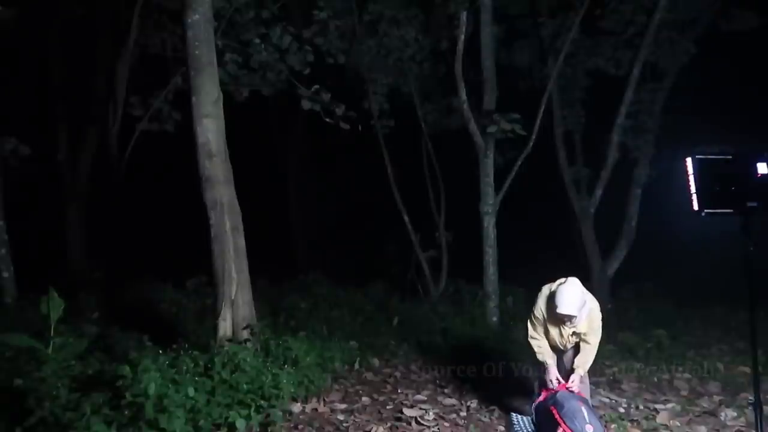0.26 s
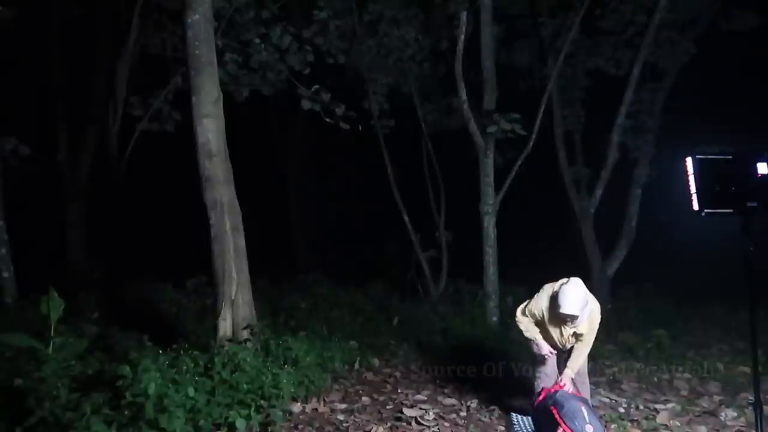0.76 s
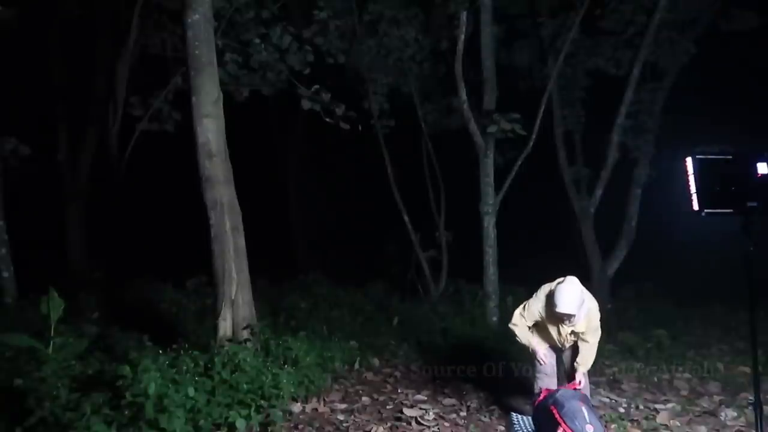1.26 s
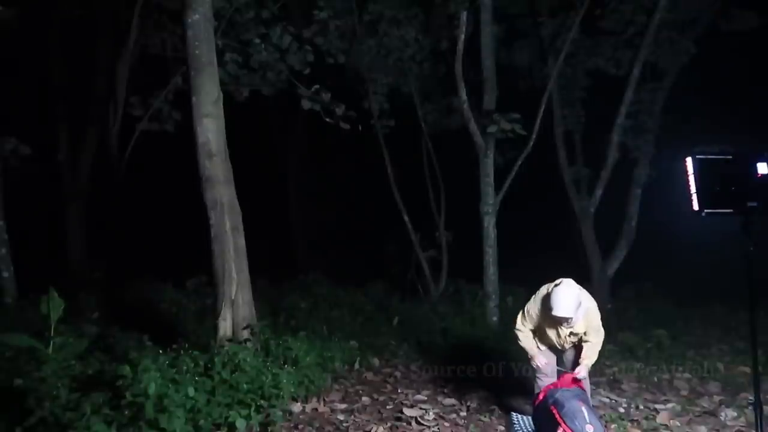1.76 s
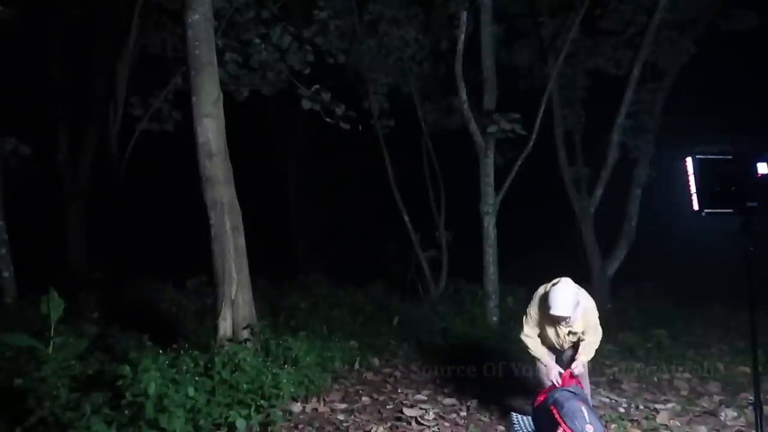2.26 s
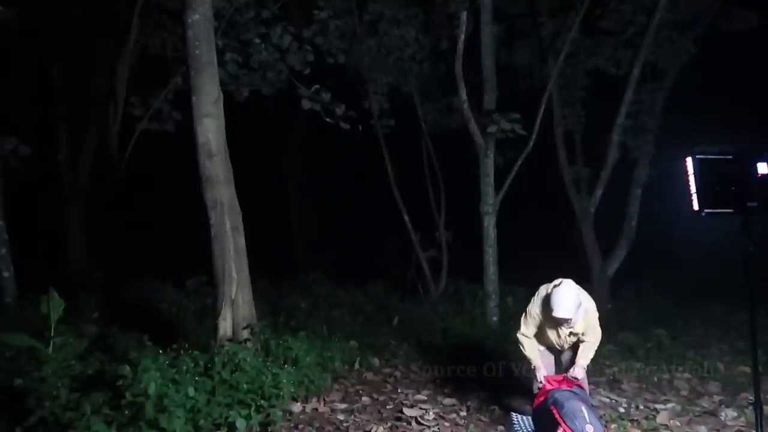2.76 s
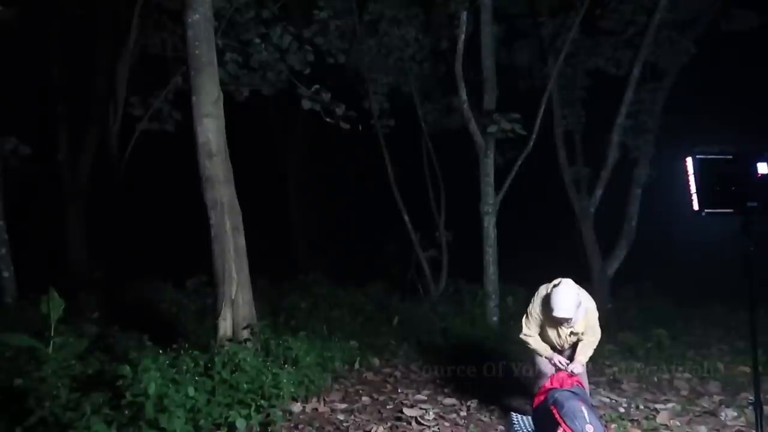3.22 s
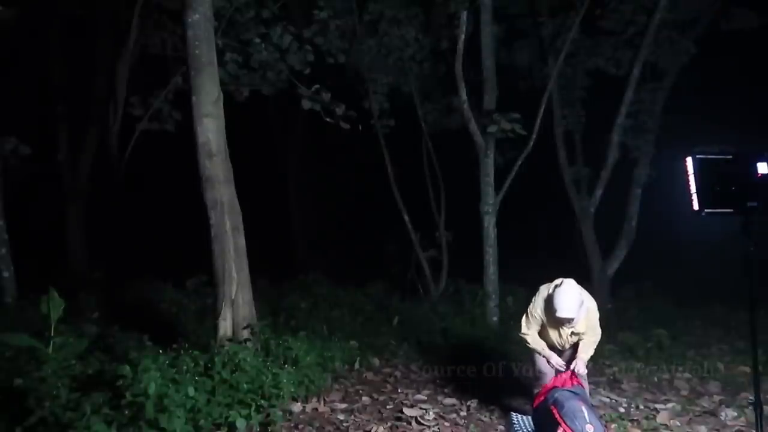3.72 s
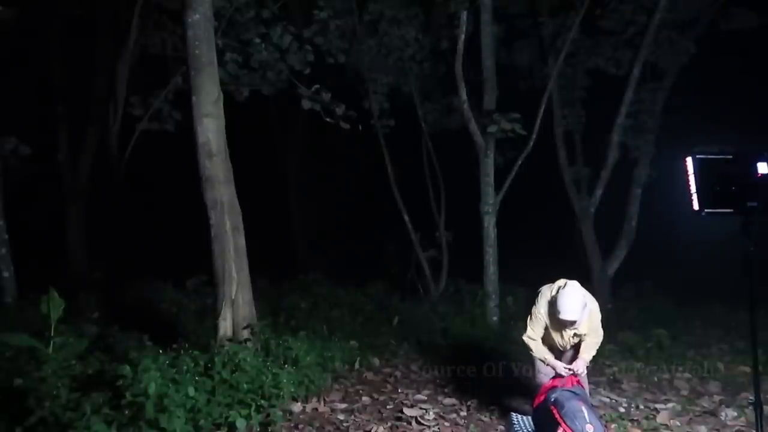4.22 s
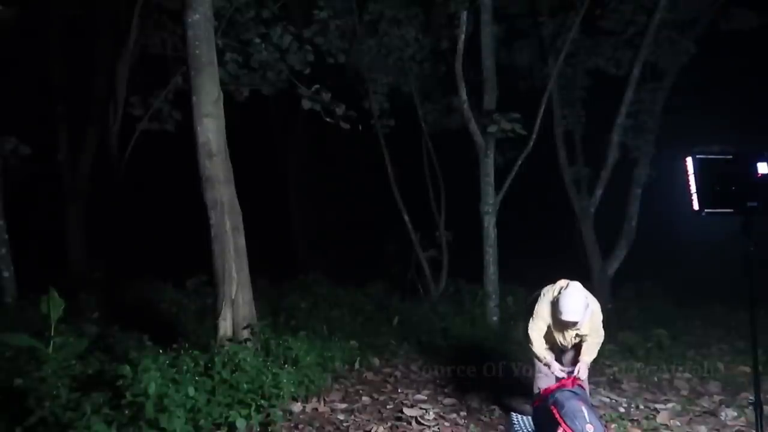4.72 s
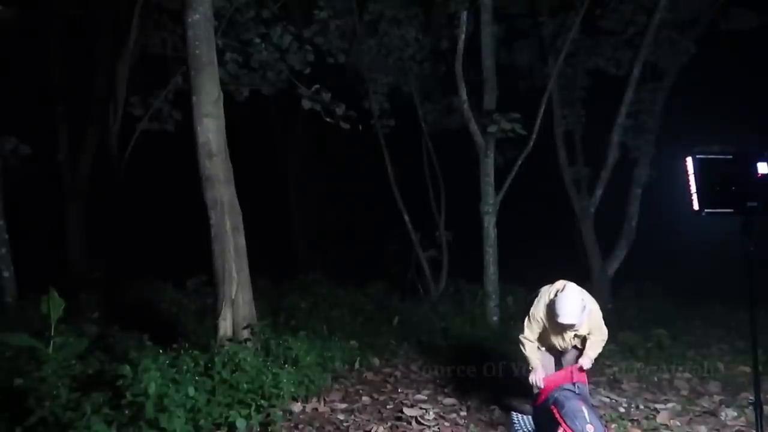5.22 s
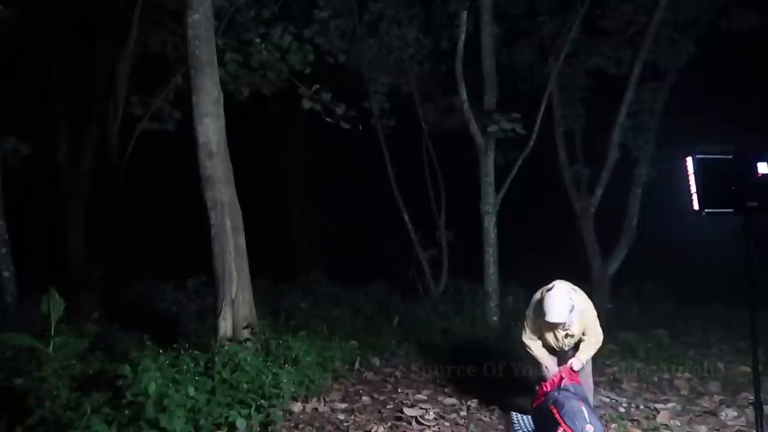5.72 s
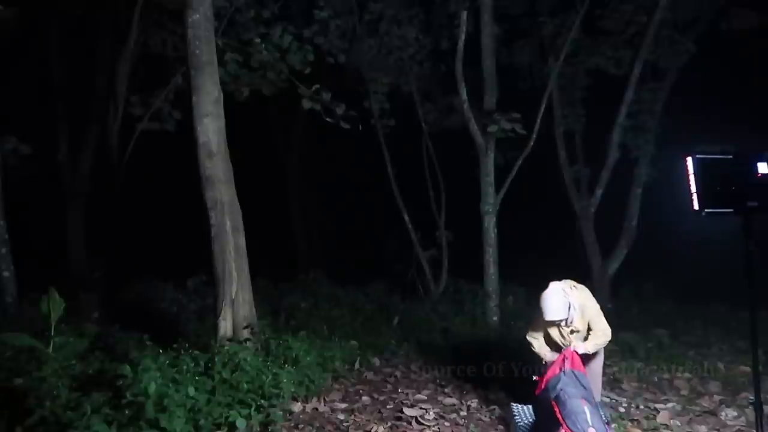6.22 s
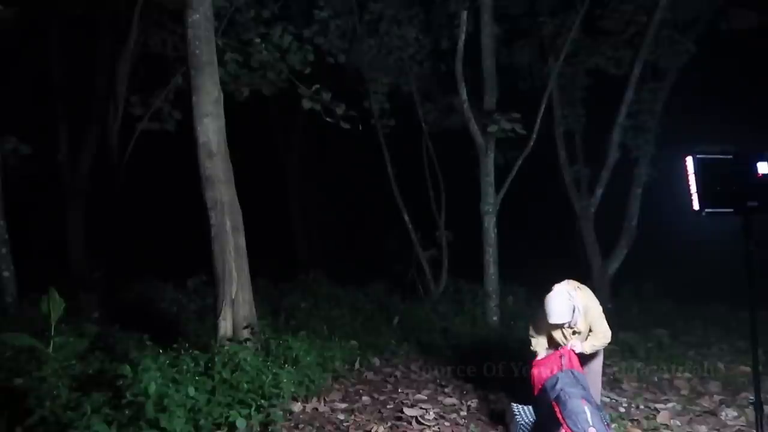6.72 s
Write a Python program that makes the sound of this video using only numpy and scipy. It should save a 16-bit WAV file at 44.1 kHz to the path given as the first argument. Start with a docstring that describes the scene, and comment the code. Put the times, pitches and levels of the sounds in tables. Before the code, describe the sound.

A night forest with steady, quiet crickets, high insect shimmer and a faint distant rumble. In front, very near and dry, slippery synthetic cloth rubs and crackles in irregular bursts, with a loud plastic snap and a firm knock early on, scattered light clicks, a calmer gap, then renewed bumps, a sharp tap, vigorous rustling and one short squeak before the cloth settles.

```python
"""A nylon backpack is packed on dry leaves, close to the microphone, in a forest at night.
Cloth and leaves are random slips through filters; a buckle, knocks and a toggle ring as damped modes;
the bag sags in low puffs and a strap squeaks by stick-slip.
Crickets and bush crickets sing among the trees, built stroke by stroke with echoes from the trunks.
Behind them, filtered noise gives far tree crickets, an insect chorus and a low, distant rumble."""
import sys
import numpy as np
from scipy import signal
from scipy.fft import rfft, irfft, next_fast_len
from scipy.io import wavfile
from scipy.ndimage import map_coordinates

SR = 44100
rng = np.random.default_rng(int(sys.argv[2]) if len(sys.argv) > 2 else 0)


def to_wav(sig):
    """Store sig (one row per channel, or 1-D mono) as 16-bit WAV at the path in sys.argv[1].

    Samples outside -1..1 are clipped; the rate is SR.
    """
    pcm = np.clip(np.atleast_2d(sig), -1, 1) * 32767
    pcm = np.round(pcm).astype(np.int16)
    wavfile.write(sys.argv[1], SR, pcm.T)  # frames by channels


N = 307377
T = np.arange(N) / SR  # time, s


def undb(db):
    """Decibels to amplitude gain."""
    return 10 ** (np.asarray(db) / 20)


def level(x, db):
    """Set the rms level in dB."""
    return x * undb(db) / np.sqrt(np.mean(x ** 2) + 1e-30)


def curves(rows):
    """Each level column of a table, joined by straight lines in time."""
    s, *columns = np.transpose(rows)
    return [np.interp(T, s, column) for column in columns]


def add(out, s, x):
    """Mix x into out at time s, trimming whatever falls outside."""
    start = int(round(s * SR))
    x = x[max(-start, 0):]
    start = max(start, 0)
    out[start:start + len(x)] += x[:max(N - start, 0)]


def add_peak(out, s, x, db):
    """Mix x in at time s with its peak at the given dB."""
    add(out, s, x * undb(db) / np.abs(x).max())


def colour(x, points):
    """Causal minimum-phase filter with the given (f/Hz, level/dB) response; output rms 1."""
    hz, db = np.transpose(points)
    size = next_fast_len(N + N // 8, real=True) // 2 * 2
    f = np.maximum(np.fft.rfftfreq(size, 1 / SR), 1)
    magnitude = undb(np.interp(np.log(f), np.log(hz), db))
    # folding the cepstrum onto positive times makes the filter causal
    cepstrum = irfft(np.log(magnitude))
    cepstrum[1:size // 2] *= 2
    cepstrum[size // 2 + 1:] = 0
    response = np.exp(rfft(cepstrum))
    return level(irfft(rfft(x, size) * response)[:N], 0)


def noise(points):
    """Coloured noise of rms 1."""
    return colour(rng.standard_normal(N), points)


def band(x, low_hz, high_hz):
    """Band-pass with a gentle lower and a steeper upper edge."""
    high_hz = min(max(high_hz, 1.1 * low_hz), .45 * SR)
    x = signal.sosfilt(signal.butter(2, low_hz, "high", fs=SR, output="sos"), x)
    return signal.sosfilt(signal.butter(4, high_hz, fs=SR, output="sos"), x)


def walk(rate):
    """Smooth random wander through `rate` random values a second, spread near 1."""
    steps = rng.standard_normal(N // 20)
    return map_coordinates(steps, [T * rate], order=2, mode="wrap")


def ring(modes, t):
    """Impulse response of damped modes (f/Hz, t60/s, level/dB)."""
    return sum(undb(db - 60 * t / t60) * np.sin(2 * np.pi * hz * t) for hz, t60, db in modes)


def trees(x, t60, wet_db):
    """Scattered echoes from trunks and leaves, as decaying noise that starts after 6 ms."""
    t = T[:SR]
    echoes = rng.standard_normal(SR) * undb(-60 * t / t60) * (t > .006)
    echoes = echoes / np.linalg.norm(echoes)
    return x + undb(wet_db) * signal.fftconvolve(x, echoes)[:N]


def stroke(hz, length, glide):
    """One wing stroke: the file sweeps the scraper and the pitch slides by the fraction `glide`."""
    u = np.arange(int(length * SR)) / (length * SR)
    phase = 2 * np.pi * np.cumsum(hz * (1 + glide * (u - .5))) / SR
    return np.sin(np.pi * u) * np.sin(phase)


# Spectrum of the distant rumble: f/Hz, level/dB (relative)
RUMBLE_COLOUR = [(12, -72), (20, -13), (48, -0.5), (158, 3), (211, 0), (271, -7), (377, -30.5), (570, -26),
                 (862, -30.5), (1020, -27), (1700, -56), (2800, -23.5), (3640, -79.5), (6160, -120)]


def distant_rumble():
    """Low-weighted noise, far off, its level wandering slowly."""
    return noise(RUMBLE_COLOUR) * undb(-57.26 + 1.0 * walk(5.6))


# Spectrum of the far insect chorus: f/Hz, level/dB (relative)
CHORUS_COLOUR = [(2600, -13), (4200, -21), (4750, -6.5), (5500, -8), (6050, -0.5), (6500, -1.5), (7000, -8),
                 (7450, -10), (8200, -20), (9000, -10.5), (9650, -6.5), (10300, -16), (11200, -30),
                 (15000, -52)]


def insect_chorus():
    """Far insects merge into shimmering bands of noise."""
    return noise(CHORUS_COLOUR) * undb(-66.0 + 1.2 * walk(1.1) + 1.0 * walk(120))


# Far tree crickets, course of the mean level: t/s, level/dB
TRILL_LEVEL = [(0, -69.5), (2.8, -65.5), (3.6, -75), (4.15, -79.5), (4.4, -62), (5.8, -63.5), (6.6, -57.5),
               (6.97, -72.5)]
# Spectrum of their trill: f/Hz, level/dB (relative)
TRILL_COLOUR = [(3050, -21), (3300, 10), (3480, 3), (3700, 9.5), (3850, -15.5), (4100, -41)]


def tree_crickets():
    """Far trills blur into a narrow band of noise with a fast flutter."""
    return noise(TRILL_COLOUR) * undb(curves(TRILL_LEVEL)[0] + 2.7 * walk(45))


def bush_cricket(pitch_hz=6060):
    """A steady buzz of rising strokes, the wings opening and closing in turn."""
    stroke_hz, back_db = 60, -2  # strokes a second; every second stroke is weaker
    out = np.zeros(N)
    scatter = rng.standard_normal((int(N / SR * stroke_hz) + 1, 3))
    for k, (late, tune, size) in enumerate(scatter):
        wing = stroke(pitch_hz * (1 + 0.0092 * tune), length=0.012, glide=.1)
        add(out, k / stroke_hz + .0009 * late, undb(back_db * (k % 2) + 1.3 * size) * wing)
    return level(trees(out, t60=.4, wet_db=-8), -64.5)


# Short, high trills of small crickets: t/s, level/dB (before the common lift), f/Hz
PEEPS = [(.18, -66, 4900), (.53, -64, 4890), (3.37, -75, 5250), (3.574, -70, 5220), (3.839, -76, 4660),
         (6.78, -72, 4980)]


def small_crickets():
    """Each peep is three quick strokes falling in pitch, lightly smeared by the forest."""
    lift_db, spacing_s = 8.5, .033
    out = np.zeros(N)
    for s, db, hz in PEEPS:
        for k in range(3):
            add(out, s + spacing_s * k, undb(db + lift_db) * stroke(hz, length=0.019, glide=-0.097))
    return trees(out, t60=.3, wet_db=-7)


# Drifting tempo of the field cricket: t/s, chirp period/s
CHIRP_PERIOD = [(0, .35), (1.2, .398), (2.6, .388), (3.7, .364), (6.5, .342)]


def chirp_times():
    """Start times of the chirps: each follows the last by the current period."""
    s = -.088  # the first chirp has already begun
    while s < T[-1]:
        yield s
        s += np.interp(s, *np.transpose(CHIRP_PERIOD))


# Effort of the field cricket, before scatter: t/s, level/dB
CHIRP_EFFORT = [(0, -48), (2.1, -55), (3.6, -49), (5.1, -53), (5.85, -48), (6.9, -56)]
# Wing strokes of one chirp: t/s after its start, mean f/Hz, level/dB (relative to the effort)
STROKES = [(0, 3270, -13.5), (.027, 3120, -0.5), (.052, 3110, -11.5), (0.08, 3060, -5.5)]


def field_cricket():
    """Even chirps of a few falling, rasping strokes, strongly smeared by the forest."""
    chirps = np.zeros(N)
    for s in chirp_times():
        effort_db = np.interp(s, *np.transpose(CHIRP_EFFORT)) + 1.0 * rng.standard_normal()
        for delay, hz, stroke_db in STROKES:
            tune, late, size = rng.standard_normal(3)
            wing = stroke(hz * (1 + 0.0087 * tune), length=.03, glide=-0.056)
            add(chirps, s + delay + 0.0013 * late, undb(effort_db + stroke_db + size) * wing)
    rasp = undb(3.5 * walk(350))
    return trees(chirps * rasp, t60=.55, wet_db=0)


# The bag sags and pushes air: t/s, level/dB rms at its height, half length/s, f/Hz
SAGS = [(0.081, -35, 0.016, 70), (0.938, -43, 0.012, 91), (1.102, -44, 0.0078, 103),
        (2.931, -50, 0.021, 66), (3.214, -53, 0.037, 70.4), (5.129, -40, 0.02, 55.4),
        (5.22, -51.5, 0.14, 60.3)]


def sags():
    """Soft, low flaps of the bag's walls: short swells of an unsteady low tone."""
    flutter = 1.26 * walk(130)  # radians
    out = np.zeros(N)
    for s, db, length, hz in SAGS:
        swell = undb(db) * np.exp(-((T - s) / length) ** 2)
        out += swell * np.sqrt(2) * np.sin(2 * np.pi * hz * (T - s) + flutter)
    return out


# Harmonics of the strap squeak: multiple of the fundamental, level/dB (relative)
SQUEAK_HARMONICS = [(1, 4.5), (2, 4.5), (3, -35), (4, -30)]


def squeak():
    """Stick-slip of webbing, rising in pitch as the pull speeds up; it swells and stops short."""
    start_s, length_s, swell_s, stop_s = 6.146, 0.0433, .028, 0.0028
    start_hz, rise_hz_per_s = 646, 6700
    t = np.clip(T - start_s, 0, length_s)
    hz = start_hz + rise_hz_per_s * t
    swell = np.minimum(t / swell_s, 1) * np.minimum((length_s - t) / stop_s, 1)
    phase = 2 * np.pi * np.cumsum(hz * (1 + .025 * walk(500))) / SR
    tone = sum(undb(db) * np.sin(multiple * phase) for multiple, db in SQUEAK_HARMONICS)
    # rms level before the swell and the roughness
    return level(tone, -29.5) * swell * undb(2.0 * walk(220))


# Hollow plastic cord toggle: f/Hz, t60/s, level/dB (relative)
TOGGLE_MODES = [(1122, 0.02, 1), (1220, 0.021, -6.5), (1540, 0.01, -8.5), (2170, 0.018, -9)]
# Its taps: t/s, peak level/dB
TAPS = [(0.651, -33.5), (0.999, -28.5)]


def toggle():
    """The toggle drags against the bag and rings woodily, with a soft onset."""
    out, t = np.zeros(N), T[:SR // 10]
    tap = ring(TOGGLE_MODES, t) * (1 - np.exp(-t / 0.0035))
    for s, db in TAPS:
        add_peak(out, s, tap, db)
    return out


# The packed bag with its fittings: f/Hz, t60/s, level/dB (relative)
BAG_MODES = [(237, 0.046, -13.5), (312, 0.1, -20.5), (386, 0.011, 4.5), (694, 0.0016, 0.5),
             (1033, 0.0074, -8), (1362, 0.0049, 7), (1603, 0.0074, 5), (2385, 0.0061, 4.5),
             (2815, 0.0088, 1.5), (4060, 0.0017, 6.5), (4990, 0.0054, 4), (8020, 0.0045, 3.5)]
# Knocks and clicks: t/s, peak level/dB, lowest f/Hz, highest f/Hz, scrape/s
KNOCKS = [(0.037, -33, 219, 596, 0.00064), (0.088, -37, 170, 443, 0.0013), (1.25, -38.5, 300, 1280, 0.0023),
          (1.32, -11, 383, 2660, 0.0003), (1.4645, -31.5, 850, 2200, 0.00053),
          (1.657, -30, 300, 4000, 0.0028), (1.7466, -27.5, 2200, 5070, 0.00068),
          (1.822, -31, 910, 3870, 0.0025), (1.878, -31.5, 2940, 6100, 0.0036),
          (2.14, -39.5, 7800, 9300, .0015), (2.4012, -34.5, 1170, 3900, 0.002),
          (3.229, -44, 990, 5100, 0.00087), (3.738, -44.5, 500, 4010, 0.0021),
          (3.7613, -47, 990, 3200, 0.00096), (4.355, -40.5, 2500, 3100, 0.0035),
          (4.3972, -33, 220, 2200, 0.002), (4.556, -40, 280, 1513, 0.0054),
          (4.8086, -35.5, 444, 2980, 0.0038), (5.0005, -20, 199, 1420, 0.00014),
          (5.015, -23.5, 398, 5830, 0.00084), (5.0191, -28, 200, 624, 0.0093),
          (5.035, -24.5, 130, 308, 0.00046), (5.2993, -16, 780, 1900, 0.0011),
          (6.0577, -18, 332, 3870, 0.0014), (6.0799, -27, 1200, 5800, 0.00011),
          (6.089, -28.5, 332, 610, 0.0013), (6.1161, -32.5, 780, 3900, 0.00053),
          (6.355, -45, 694, 2160, 0.00066), (6.511, -32, 496, 2500, 0.002)]


def knocks():
    """Gear and fittings strike the bag: clean blows are one push, glancing ones a brief scrape."""
    out, t = np.zeros(N), T[:SR // 10]
    body = ring(BAG_MODES[::2], t) - ring(BAG_MODES[1::2], t)  # neighbours swing in opposite senses
    for s, db, low_hz, high_hz, scrape in KNOCKS:
        contact = 0.22 * rng.standard_normal(len(t)) * np.exp(-t / scrape) * (1 - np.exp(-t / 0.00042))
        contact[0] = np.exp(-scrape / 0.0051)  # the push, weaker for a longer scrape
        add_peak(out, s, band(signal.fftconvolve(contact, body), low_hz, high_hz), db)
    return out


# The main buckle: f/Hz, t60/s, level/dB (relative)
BUCKLE_MODES = [(2860, 0.0052, -11), (3730, 0.0018, 8), (4400, 0.0028, 1), (5300, 0.0018, -29),
                (7290, 0.004, -7.5), (9140, 0.0031, -4), (12800, 0.0012, -8.5), (3460, 0.12, -36.5),
                (1390, .02, -61), (8540, 0.029, -34)]
# Its snaps: t/s, peak level/dB
SNAPS = [(1.0969, -2.5)]


def buckle():
    """The prongs spring home: a hard crack and a faint plastic ring."""
    out, t = np.zeros(N), T[:SR // 8]
    snap = ring(BUCKLE_MODES, t) * (1 - np.exp(-t / 0.00052))
    for s, db in SNAPS:
        add_peak(out, s, snap, db)
    return out


# Hollow, pitched rubs: t/s, level/dB rms before the swell, half length/s, pitch f/Hz, width f/Hz
SCRAPES = [(0.018, -58.5, 0.11, 1790, 250), (0.486, -57, 0.047, 1850, 295), (0.964, -56, 0.069, 1306, 200),
           (2.41, -49, 0.009, 1500, 200), (2.561, -42.5, 0.019, 2600, 1970), (4.968, -48, 0.024, 2560, 225),
           (5.383, -42, 0.02, 2760, 650), (6.241, -53, 0.046, 2830, 555), (6.324, -42, 0.016, 650, 219),
           (6.357, -44, 0.04, 1100, 455)]


def scrapes():
    """Taut cloth and webbing drag briefly and sound around one pitch."""
    out, t = np.zeros(N), T[:SR // 2] - .25
    for s, db, length, hz, width in SCRAPES:
        edges = [hz - width / 2, hz + width / 2]
        resonance = signal.butter(2, edges, "band", fs=SR, output="sos")
        drag = signal.sosfilt(resonance, rng.standard_normal(len(t)))
        add(out, s + t[0], level(drag, db) * np.exp(-(t / length) ** 2))
    return out


def pull(s, length):
    """Envelope of one pull: it takes hold, keeps sliding, then the cloth settles."""
    grip_s, slide_db_per_s, settle_s = 0.021, -0.5, 0.049
    grip = np.clip(.5 + (T - s) / (2 * grip_s), 0, 1) ** 2
    slide = undb(slide_db_per_s * np.clip(T - s, 0, length))
    return grip * slide * np.exp(-np.maximum(T - s - length, 0) / settle_s)


# Hands resting on the bag between pulls: t/s, level/dB (before the layer trims)
TOUCH = [(0, -67), (1.0, -63.5), (2.0, -64), (3.6, -69), (3.95, -78), (4.45, -76), (4.85, -62), (5.75, -65),
         (6.97, -71)]
# Pulls and pushes of the hands on the cloth, before the layer trims:
# t/s, length/s, level/dB, crispness/dB and heavy folds/dB (both relative to that level)
RUBS = [(0.0, 0.028, -54, -0.5, 2.5), (0.124, 0.11, -68, 7, 8.5), (0.51, 0.031, -53, -6.5, -3.5),
        (0.682, 0.2, -68, 4.5, 5.5), (0.94, 0.16, -55, -7.5, -2.5), (1.038, 0.12, -46.5, -8, -12.5),
        (1.292, .14, -48, -7.5, -9.5), (1.457, 0.023, -42, -5.5, -7.5), (1.538, 0.22, -48.5, -3, -7.5),
        (1.816, 0.061, -51.5, 3, -14), (2.238, 0.046, -53, -9, -29), (2.383, .015, -51, -5, -10),
        (2.483, 0.057, -47.5, -7, -9), (2.529, 0.019, -42.5, -4.5, -20), (2.654, .07, -52.5, -7, -8),
        (2.902, 0.097, -60, 0, -2.5), (3.575, 0.028, -62.5, -5, -21), (4.549, 0.092, -57.5, -6, 0),
        (4.626, .07, -54.5, -2, -22), (4.771, .03, -52.5, -2, -19), (4.96, .07, -49, -5, -3),
        (5.07, 0.21, -52, -11, -1), (5.276, 0.11, -39, -4, -10.5), (5.578, .06, -58, -9, -14),
        (5.925, 0.078, -45.5, -8, -13), (6.006, 0.077, -46.5, -1.5, -3), (6.125, .255, -47.5, -9.5, -0.5),
        (6.421, 0.12, -47, -4, -0.5), (6.556, 0.15, -53.5, -5.5, -6)]


def handling():
    """Strength of rubbing, creasing and folding: resting hands plus every pull, added in power."""
    touch_crisp_db, touch_folds_db = -4.5, -1
    power = np.outer(undb([0, touch_crisp_db, touch_folds_db]), undb(curves(TOUCH)[0])) ** 2
    for s, length, db, crisp_db, fold_db in RUBS:
        power += np.outer(undb([db, db + crisp_db, db + fold_db]), pull(s, length)) ** 2
    return np.sqrt(power)


def grains(rate, scatter_db):
    """Random tiny slips, rate a second, a few far bigger than the rest; rms 1."""
    size = undb(scatter_db * np.minimum(rng.exponential(size=N), 4))
    happens = rng.random(N) < rate / SR
    return level(happens * size * rng.choice([-1, 1], N) / np.sqrt(rate), 0)


def crumple(x, depth_db, rate):
    """Folds keep changing shape, so each quarter octave swells and fades by itself."""
    size = next_fast_len(N, real=True)
    f = np.maximum(np.fft.rfftfreq(size, 1 / SR), 1)
    place = np.clip(4 * np.log2(f / 350), 0, 18)  # quarter octaves above 350 Hz
    spectrum, out = rfft(x, size), 0
    for k in range(19):
        share = np.maximum(1 - np.abs(place - k), 0)
        out = out + irfft(spectrum * share, size)[:N] * undb(depth_db * walk(rate))
    return out


# Spectra of nylon on nylon, of crisp creases and dry leaves, of heavy folds: f/Hz, level/dB (relative)
NYLON_COLOUR = [(350, -12.5), (700, 1), (1100, 4.5), (1500, 6), (1950, 3), (2500, 4.5), (3200, -1),
                (4000, -8.5), (5500, -50.5)]
CRISP_COLOUR = [(2200, -27), (3300, -3), (4200, 2), (5200, -5), (6200, -18), (8300, -17.5), (10500, -32),
                (14500, -33), (16000, -65.5)]
FOLDS_COLOUR = [(130, -19.5), (240, -3), (330, 0.5), (430, 1), (600, 0), (900, -2), (1600, -45.5)]


def rustle():
    """Cloth slides in small jerks; creases and dry leaves crackle, more densely the harder it is pushed."""
    rub, crisp, fold = handling()
    rub_db = 20 * np.log10(rub)
    crackle = grains(1600 * undb(.3 * (rub_db + 51)), scatter_db=3.5)
    pops = undb(-11) * grains(55, scatter_db=0.5)  # creases popping
    hiss = rng.standard_normal(N)
    # a light touch only whispers; firm handling buckles the creases
    firm = np.clip((rub_db + 74.5) / 20, .3, 1)
    slips = crumple(firm * crackle + pops + hiss, depth_db=4.0, rate=32)
    slips = slips * undb(1.8 * walk(80) + 1.0 * walk(25))
    cloth = undb(-0.56) * rub * colour(slips, NYLON_COLOUR)
    leaves = undb(-2.0) * crisp * colour(slips, CRISP_COLOUR)
    folds = undb(0.47) * fold * colour(slips, FOLDS_COLOUR)
    return cloth + leaves + folds


def scene():
    """The bag close to the microphone, the insects all around, the rumble far off."""
    background = distant_rumble() + insect_chorus() + tree_crickets()
    crickets = bush_cricket() + small_crickets() + field_cricket()
    contacts = squeak() + toggle() + knocks() + buckle() + scrapes() + rustle()
    bag = sags() + trees(contacts, t60=0.3, wet_db=-23.0)
    return (background + crickets + bag)[None]  # one channel


def record(dry):
    """The recorder cuts the top steeply above 15.5 kHz."""
    return signal.sosfilt(signal.ellip(8, .2, 70, 15500, fs=SR, output="sos"), dry)


dry = scene()
out = record(dry)
to_wav(out)
```